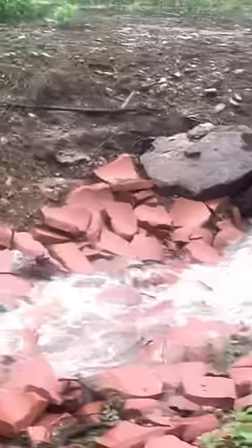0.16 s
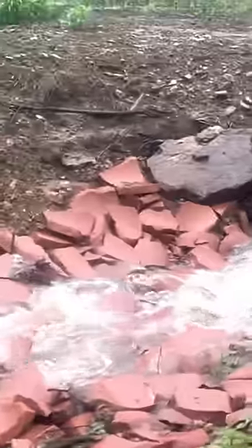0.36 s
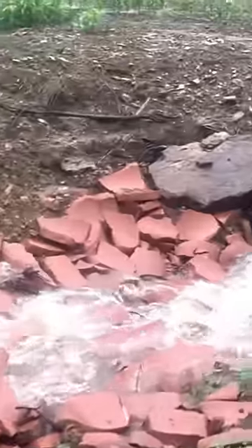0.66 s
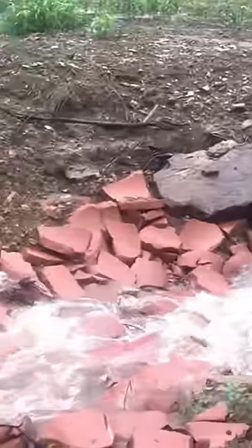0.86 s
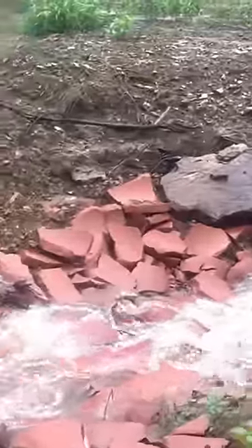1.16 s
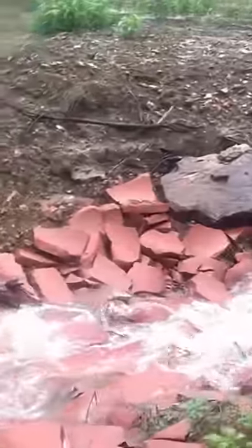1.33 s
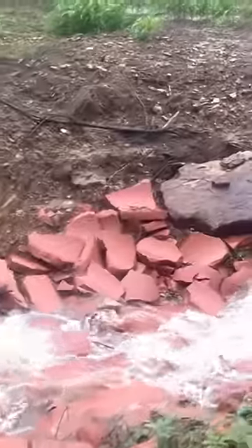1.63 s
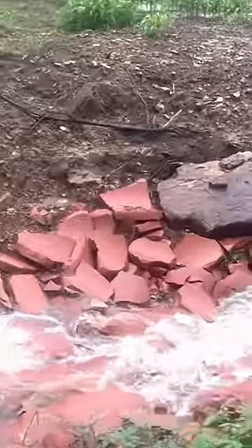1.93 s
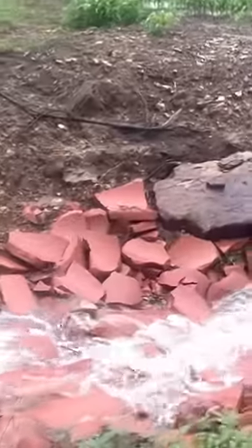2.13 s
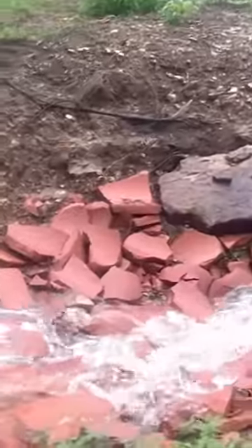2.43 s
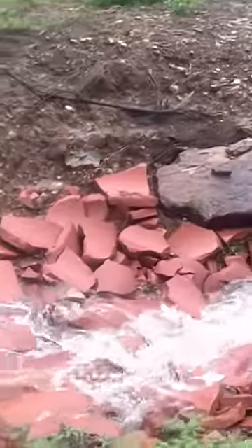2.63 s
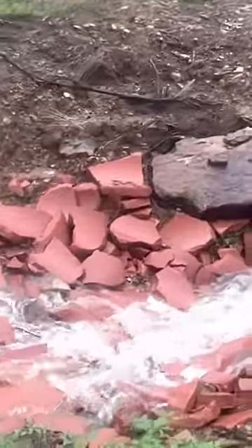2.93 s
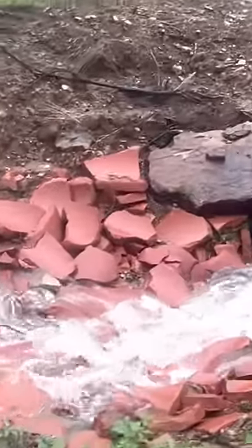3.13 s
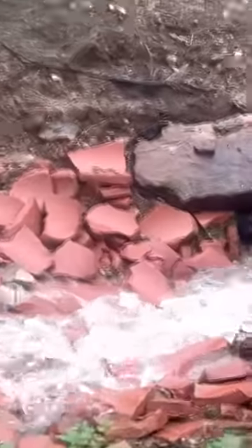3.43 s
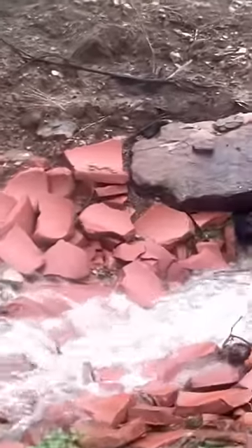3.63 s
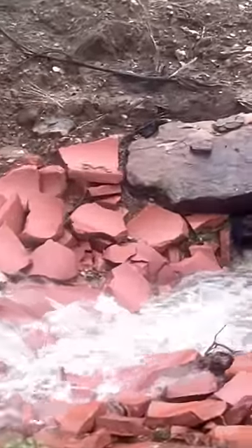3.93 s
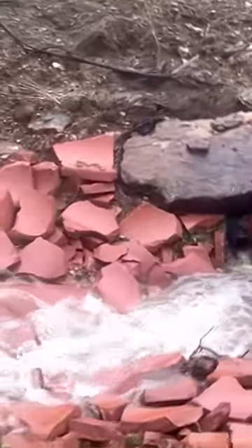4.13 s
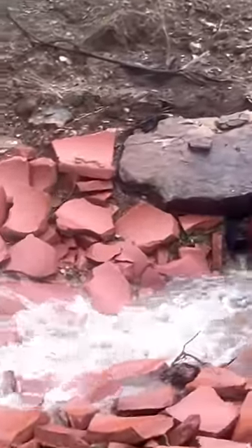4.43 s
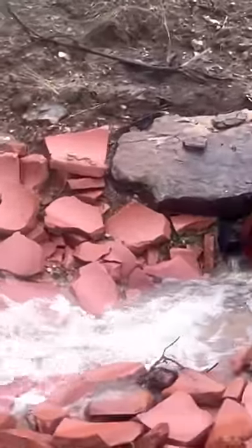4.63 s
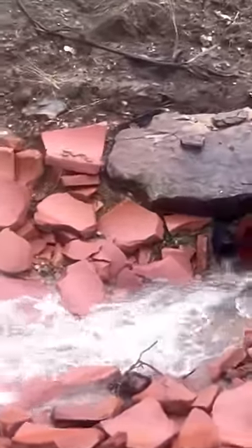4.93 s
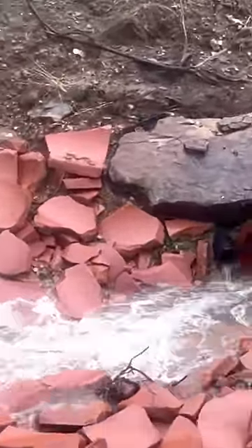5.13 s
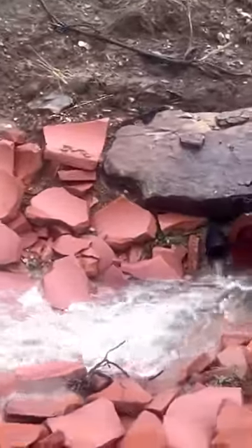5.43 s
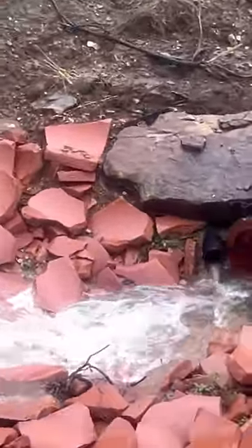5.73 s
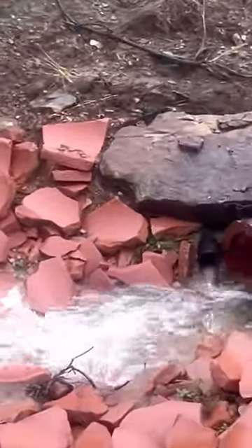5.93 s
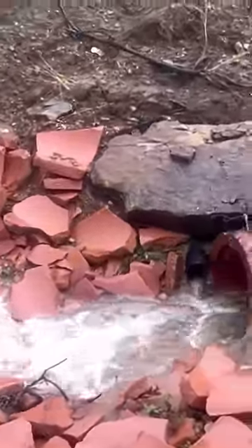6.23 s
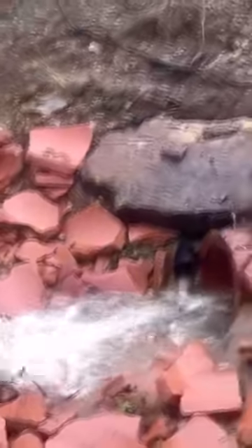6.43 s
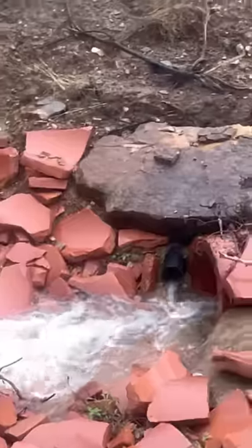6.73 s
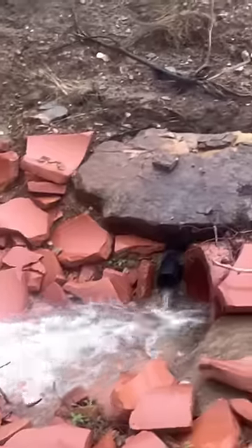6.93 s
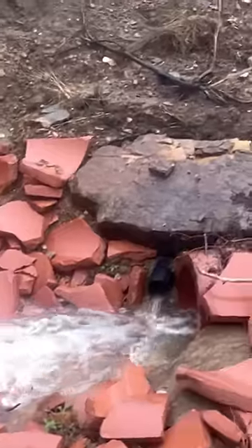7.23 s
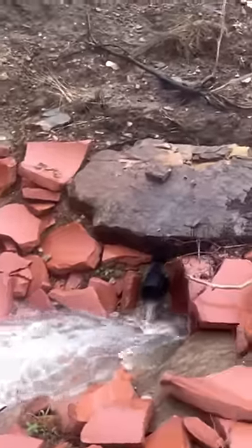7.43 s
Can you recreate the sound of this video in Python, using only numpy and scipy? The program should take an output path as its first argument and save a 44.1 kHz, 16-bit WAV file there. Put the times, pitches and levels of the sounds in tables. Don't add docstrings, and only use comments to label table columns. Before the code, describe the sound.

A steady, close gush of storm water pours from a drain pipe across broken tile and rock. Bubbles and splashes blend into a full wash over a low pipe rumble and faint engine drone. Early drips plink on the left; the flow swells slightly midway. Around six seconds wind thumps the hand-held stereo microphone, with one sharp droplet tick soon after.

```python
import sys
import numpy as np
from scipy import signal
from scipy.fft import rfft, irfft
from scipy.io import wavfile
from scipy.ndimage import uniform_filter1d

SR = 44100
rng = np.random.default_rng(int(sys.argv[2]) if len(sys.argv) > 2 else 0)


def magnitude_from_level(level_db):
    exponent = np.asarray(level_db, float) / 20
    return 10 ** exponent


def generate_wav(sig):
    pcm = np.round(np.clip(np.atleast_2d(sig).T, -1, 1) * 32767).astype(np.int16)
    wavfile.write(sys.argv[1], SR, pcm)


N = 333727

# time in seconds, level in dB.
FLOW_LEVEL = [
    (0, -37.5),
    (1.2, -37.5),
    (2.3, -37.5),
    (3.25, -36.8),
    (3.7, -35.8),
    (4.2, -36.5),
    (4.8, -36.5),
    (5.8, -37),
    (6.6, -37),
    (7.57, -37.3),
]
# pitch in Hz, level in dB per Hz.
WATER_COLOUR = [(30, -28), (120, 9.5), (250, 2.5), (450, 1.5), (850, 1.5), (1250, -2.5), (1800, -7),
                (2600, -7), (4000, -12.5), (6300, -18), (7200, -16), (11000, -18), (13500, -22),
                (15600, -27)]
# pitch in Hz, level in dB.
RIGHT_PORT = [(200, -1), (800, -0.5), (1500, 3.5), (2500, -2), (3900, -1.5), (4800, 4), (5500, 8),
              (6000, 6), (6500, 0.5), (6800, 5.5)]
# pitch in Hz, likeness from 0 to 1,
# lag of the right port in radians before the turn, the same lag after the turn.
PORT_LIKENESS = [(100, 0.99, .3, 0.45), (396, 0.9, 0, 0), (1010, 0.85, 0.36, 0.05), (1340, 0.36, 1.35, 1.5),
                 (1620, 0.7, 0.75, 0.9), (1760, 0.5, 2.5, 2), (2600, 0.35, 0.15, 0.86), (3500, 0.3, 1.5, 1),
                 (4330, 0.05, -3.5, -4.5), (4800, 0.1, -2, -2), (5750, 0.54, -3, -2.5),
                 (6700, 0.6, 0.5, -1)]
TURN_S = 3.45
# time in seconds, swell in dB, pitch in Hz.
GLUGS = [(.1, 1, 2400), (.21, -3, 850), (.42, -2, 2200), (1.49, 1.5, 2800), (1.68, 2, 750),
         (2.01, 1.5, 750), (2.15, -2.5, 900), (2.5, 2, 1190), (2.52, 3, 2400), (2.77, 2, 1300),
         (2.91, -2.5, 750), (2.72, 3, 210), (3.63, 2, 750), (4.1, 2, 1350), (4.19, -2.5, 850),
         (4.52, 3, 800), (4.54, 2, 2400), (4.71, 2, 800), (4.82, -3.5, 2800), (4.85, 4.5, 694),
         (5.09, 5, 400), (5.29, 3, 1400), (5.68, 4, 8500), (5.69, 1.5, 3500), (5.7, 3, 400),
         (6.25, -5, 400), (6.47, -2.5, 800), (6.7, 2.5, 900), (6.99, 2.5, 3300), (7.08, -0.5, 800)]
# pitch in Hz, likeness from 0 to 1 between the comb's in-step and opposed points.
TREBLE_LIKENESS = [(8000, .65), (11000, .63), (13500, .4)]
JOINT_HZ = 6800
IN_STEP_HZ, STEP_PERIOD_HZ = 7260, 5040
# pitch in Hz, level in dB per Hz.
RUMBLE_COLOUR = [(18, -34), (30, -18), (50, -4), (70, -2), (110, -24), (160, -12), (260, -25), (500, -53)]
# time in seconds, firing rate in Hz, level of the sixth order in dB.
ENGINE_RUN = [
    (0, 22.39, -42),
    (1.5, 22.37, -44.5),
    (3.2, 22.34, -44.5),
    (4.2, 22.26, -49.5),
    (5.5, 22.43, -47.5),
    (7.57, 22.17, -55),
]
# multiple as a plain number, level in dB.
ENGINE_ORDERS = [(2, -18), (3, -7.5), (4, -12), (5, -3.5), (6, 0), (7, -14), (8, -19), (9, -11.5)]
# time in seconds, peak in dB, half length in seconds.
GUSTS = [(.62, -43, 0.11), (1.4, -47, .12), (1.78, -44, .06), (2.0, -44, .07), (2.25, -43, .1),
         (2.6, -43, 0.11), (2.95, -46, .08), (3.2, -40, .1), (3.484, -37, 0.18), (3.95, -39, 0.12),
         (4.4, -41, 0.092), (4.7, -37, .1), (5.15, -39.5, 0.18), (5.4, -43, .08), (5.75, -39, .1),
         (6.05, -38, .1), (6.25, -40, .06), (6.48, -36.5, .08), (6.83, -47, .06), (7.28, -39, 0.1),
         (7.5, -45, 0.097)]
# pitch in Hz, level in dB per Hz.
GUST_COLOUR = [(25, -27), (50, -4), (80, 3), (130, -0.5), (200, -5.5), (300, -15), (600, -41)]
# time in seconds, peak in dB, pitch in Hz.
DRIPS = [
    (.15, -43, 2550),
    (.278, -43, 2650),
    (.548, -35, 2650),
    (.605, -36, 2500),
    (.815, -38, 2650),
    (1.44, -34, 2600),
    (1.49, -33, 2700),
    (2.03, -31, 2440),
    (2.25, -35, 2900),
    (2.49, -36, 2750),
]
# time in seconds, peak in dB, pitch in Hz, left over right in dB.
PLINKS = [(0.256, -37, 4710, 5.7), (0.356, -36, 2425, -0.8), (0.572, -37.3, 5250, -11),
          (0.622, -44, 5120, -0.7), (0.708, -37, 5414, -3.4), (0.751, -41, 5343, 0), (0.883, -37, 5415, -8),
          (0.9, -46, 2487, -8), (0.9, -35, 1396, -10.4), (0.949, -37, 2637, 14), (1.418, -47, 4344, -18),
          (2.556, -30, 2550, 8), (3.193, -28.5, 322, 2), (4.08, -31, 1264, -6), (4.123, -30, 1400, -16),
          (4.512, -31, 2448, -2.3), (5.342, -30, 2525, 2.2), (5.662, -41, 5497, -6.0),
          (6.966, -35, 2540, 4), (6.966, -32, 5500, -12), (7.429, -35.1, 5335, -20)]
# time in seconds, tick in dB, tick pitch in Hz,
# spatter in dB, spatter length in seconds.
SNAPS = [
    (.708, -37, 6000, -32, .001),
    (5.661, -30, 8000, -24, .003),
    (5.666, -32, 8000, -30, .001),
    (5.68, -38, 7000, -33, .002),
    (6.3736, -15, 7170, -28, .0008),
    (6.451, -38, 7850, -32, .002),
    (6.969, -34, 6500, -25, .003),
    (7.429, -42, 5500, -41, 0.0018),
]
# time in seconds, peak in dB, pitch in Hz,
# half-power length in seconds, left over right in dB.
PUFFS = [(3.408, -34, 124, 0.014, 0), (3.999, -28, 151, 0.0099, 12), (4.486, -28, 101, 0.01, -2),
         (5.158, -31, 103, .01, 4), (5.52, -28, 88, 0.01, -3), (5.57, -34, 91, 0.0085, 13),
         (5.695, -32, 101, 0.0097, 10), (6.017, -16, 108, 0.0073, -2.5), (6.041, -16.5, 75.4, 0.014, -.5),
         (6.09, -16, 75, 0.019, -2), (6.112, -19.5, 105, 0.016, -2), (6.16, -19, 65, 0.029, 2),
         (6.219, -26.5, 89, 0.019, 1), (6.286, -29, 100, 0.009, 7), (6.337, -25.5, 75, .028, -2.5),
         (6.379, -17, 72, 0.013, 1), (6.462, -23, 90, 0.0099, -5), (6.498, -28, 65, 0.008, 8),
         (6.532, -24, 85, 0.0096, -5), (6.558, -23, 72, 0.011, 1), (6.826, -26, 109, 0.014, -2),
         (6.844, -24, 70, 0.01, 1), (6.896, -30, 105, .01, 1), (6.947, -33, 70, .012, -2)]


def evened(x):
    return x / np.sqrt(np.mean(abs(x) ** 2) + 1e-20)


def read(points, hz, axis=1):
    table = np.transpose(points)
    return np.interp(np.log(hz + 1), np.log(table[0] + 1), table[axis])[:, None]


def along(rows, t):
    s, *columns = np.transpose(rows)
    return [np.interp(t, s, c) for c in columns]


def sides(db):
    return magnitude_from_level(db * np.array([[0.5], [-0.5]]))


def add(mix, s, sound):
    start = round(s * SR) - sound.shape[1] // 2
    mix[:, max(start, 0):start + sound.shape[1]] += sound[:, max(-start, 0):N - start]


def shared_treble(a, b, hz):
    half = np.pi * (hz - IN_STEP_HZ) / STEP_PERIOD_HZ
    tie = read(TREBLE_LIKENESS, hz[:, 0])
    mid = a * np.cos(half)
    side = 1j * np.sin(half) * (tie * a + np.sqrt(1 - tie ** 2) * b)
    return np.array([mid + side, mid - side])


def low_noise(colour, same, lumpy_db):
    hz, t, (a, b) = signal.stft(rng.standard_normal((2, N)), SR, nperseg=2048, noverlap=1536)
    lumps = evened(uniform_filter1d(rng.standard_normal(len(t)), size=4))
    right = same * a + np.sqrt(1 - same ** 2) * b
    z = np.array([a, right]) * magnitude_from_level(read(colour, hz) + lumpy_db * lumps)
    return evened(signal.istft(z, SR, nperseg=2048, noverlap=1536)[1][:, :N])


def bubbles(per_s=9000, cycles=8.95, spread_db=3.1, rise=0.149):
    out = np.zeros(N)
    sizes = magnitude_from_level(spread_db * np.minimum(rng.exponential(1, N), 6))
    for hz in np.geomspace(200, 15000, num=32):
        turns = np.arange(int(3 * cycles * SR / hz)) * hz / SR
        fade = np.exp(-2 * turns / cycles) * (1 - np.exp(-turns))
        ring = np.sin(2 * np.pi * turns * (1 + rise * turns / cycles)) * fade
        share = per_s * (hz / 3000) ** 0.25 / 32
        births = sizes * (rng.random(N) < share / SR)
        out += np.sqrt(hz) * evened(signal.oaconvolve(births, ring)[:N])
    return evened(out)


def flow_swells(hz, t, spray, surge_db=0.25, churn_db=0.2):
    splash_follows, spray_follows = 0.68, 0.55
    body_db, = along(FLOW_LEVEL, t)
    swell_db = body_db - body_db.mean()
    surge, churn = (evened(uniform_filter1d(v, 24)) for v in rng.standard_normal((2, len(t))))
    splash_db = (splash_follows - 1) * swell_db - 1.04 * np.maximum(t - 5.05, 0) + churn_db * churn
    spray_db = (spray_follows - 1) * swell_db + 0.5 * np.minimum(t, 3) + surge_db * surge
    splash = np.clip(np.log2(hz / 1200 + 1e-9), 0, 1)[:, None]
    splash_part = (splash - spray) * (splash_db - splash_db.mean())
    return body_db + splash_part + spray * (spray_db - spray_db.mean())


def glugs(hz, t, length_s=0.048, width_octaves=0.51):
    glug_s, glug_db, glug_hz = np.transpose(GLUGS)
    pockets = np.exp(-(np.log2(hz[:, None] / glug_hz + 1e-9) / width_octaves) ** 2)
    moments = np.exp(-((t - glug_s[:, None]) / length_s) ** 2)
    return (glug_db * pockets) @ moments


def water(bubbly=0.54, patchy_db=1.09, flicker_db=0.23, spray_flicker_db=0.33):
    hiss_share = np.sqrt(1 - bubbly ** 2)
    mixes = [bubbly * bubbles() + hiss_share * rng.standard_normal(N) for _ in range(2)]
    hz, t, (a, b) = signal.stft(np.array(mixes), SR, nperseg=1024, noverlap=768)
    spray = np.clip(np.log2(hz / 3300 + 1e-9), 0, 1)[:, None]

    patches = uniform_filter1d(rng.standard_normal(a.shape), 10, 0)
    patches = evened(uniform_filter1d(patches, 6, 1))
    flicker = evened(uniform_filter1d(rng.standard_normal(len(t)), 5))
    patches, flicker = (v - uniform_filter1d(v, 22) for v in (patches, flicker))
    field_db = flow_swells(hz, t, spray) + glugs(hz, t) + patchy_db * patches
    field_db += (flicker_db + (spray_flicker_db - flicker_db) * spray) * flicker

    same = read(PORT_LIKENESS, hz)
    lag = np.where(t < TURN_S, read(PORT_LIKENESS, hz, axis=2), read(PORT_LIKENESS, hz, axis=3))
    right = same * a * np.exp(-1j * lag) + np.sqrt(1 - same ** 2) * b
    right *= magnitude_from_level(read(RIGHT_PORT, hz))
    z = np.where(hz[:, None] > JOINT_HZ, shared_treble(a, b, hz[:, None]), [a, right])
    z *= magnitude_from_level(read(WATER_COLOUR, hz) + field_db)
    return magnitude_from_level(12.5) * signal.istft(z, SR, nperseg=1024, noverlap=768)[1][:, :N]


def rumble(level_db=-44.5):
    return magnitude_from_level(level_db) * low_noise(RUMBLE_COLOUR, same=0.75, lumpy_db=0.5)


def engine(waver_db=0.4, right_lag=0.41, first_firing_s=0.0052):
    hz, level_db = along(ENGINE_RUN, np.arange(N) / SR)
    turns = np.cumsum(hz) / SR - first_firing_s * hz[0]
    lag = np.array([[0], [right_lag]])
    drone = np.zeros((2, N))
    for (k, db), points in zip(ENGINE_ORDERS, rng.standard_normal((len(ENGINE_ORDERS), 40))):
        waver = np.interp(np.linspace(0, 39, num=N), np.arange(40), points)
        drone += magnitude_from_level(db + waver_db * waver) * np.cos(2 * np.pi * k * turns - lag)
    return np.sqrt(2) * magnitude_from_level(level_db) * drone * magnitude_from_level(np.array([[1.5], [-0.5]]))


def wind(lull_db=-54, left_db=3):
    t = np.arange(N) / SR
    power = magnitude_from_level(lull_db) ** 2
    for s, db, length in GUSTS:
        power = power + magnitude_from_level(db) ** 2 * np.exp(-((t - s) / length) ** 2)
    return np.sqrt(power) * sides(left_db) * low_noise(GUST_COLOUR, same=-0.72, lumpy_db=2.0)


def plinks(cycles=5.1, rise=0.066, drip_pan_db=6):
    out = np.zeros((2, N))
    for s, db, hz, pan_db in PLINKS + [(*drip, drip_pan_db) for drip in DRIPS]:
        turns = np.arange(-2000, 2000) / SR * hz
        ring = np.exp(-(turns / cycles) ** 2) * np.cos(2 * np.pi * turns * (1 + rise * turns / cycles))
        add(out, s, magnitude_from_level(db - 4.5) * sides(pan_db) * ring)
    return out


def snaps(length=0.00051, dull_hz=11000, loose=0.45):
    out, t = np.zeros((2, N)), np.arange(-600, 600) / SR
    hz = np.fft.rfftfreq(1200, 1 / SR)[:, None]
    port = magnitude_from_level(read(RIGHT_PORT, hz[:, 0]))
    for (s, db, tick_hz, spatter_db, spread), noise in zip(SNAPS, rng.standard_normal((len(SNAPS), 2, 1200))):
        tick = magnitude_from_level(db) * np.exp(-(t / length) ** 2) * np.cos(2 * np.pi * tick_hz * t)
        fade = np.exp(-abs(t) / np.where(t < 0, 0.0007, spread))
        hiss = magnitude_from_level(spatter_db) * fade * np.diff(noise, prepend=0) / 2
        a, b = rfft(hiss + np.array([tick, -tick]))[..., None] / (1 + (hz / dull_hz) ** 6)
        treble = shared_treble(a, b, hz) + loose * np.array([b, -a])
        z = np.where(hz > JOINT_HZ, treble, [a, 0.7 * (a + b) * port])
        add(out, s, irfft(z[..., 0]))
    return out


def puffs(apart=0.3, glide=-0.068):
    out, t = np.zeros((2, N)), np.arange(-3000, 3000) / SR
    for (s, db, hz, length, pan_db), (phase, skew) in zip(PUFFS, rng.random((len(PUFFS), 2))):
        turn = 2 * np.pi * (hz * t * (1 + glide * np.tanh(t / length) / 2) + phase)
        offset = apart * (2 * skew - 1) * np.array([[0.5], [-0.5]])
        swell = np.exp(-1.4 * (t / length) ** 2)
        add(out, s, magnitude_from_level(db) * sides(pan_db) * swell * np.cos(turn + offset))
    return out


def scene():
    return water() + rumble() + engine() + wind() + plinks() + snaps() + puffs()


def low_pass(x):
    return signal.sosfilt(signal.butter(12, 15760, fs=SR, output="sos"), x)


def record(dry):
    cut = signal.sosfilt(signal.butter(2, 33, "high", fs=SR, output="sos"), dry)
    cut = signal.oaconvolve(cut, signal.firwin(255, 15760, fs=SR)[None], "same")
    return low_pass(cut)


dry = scene()
out = record(dry)
generate_wav(out)
```